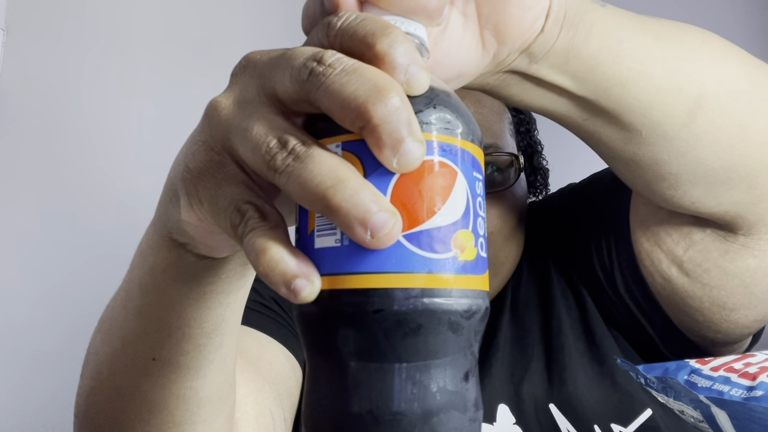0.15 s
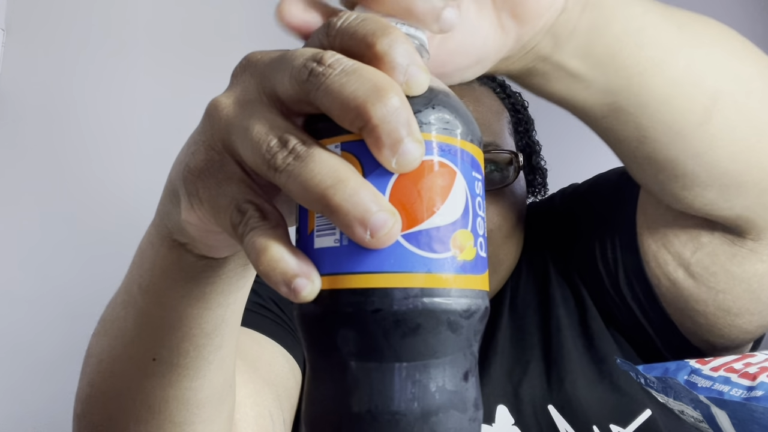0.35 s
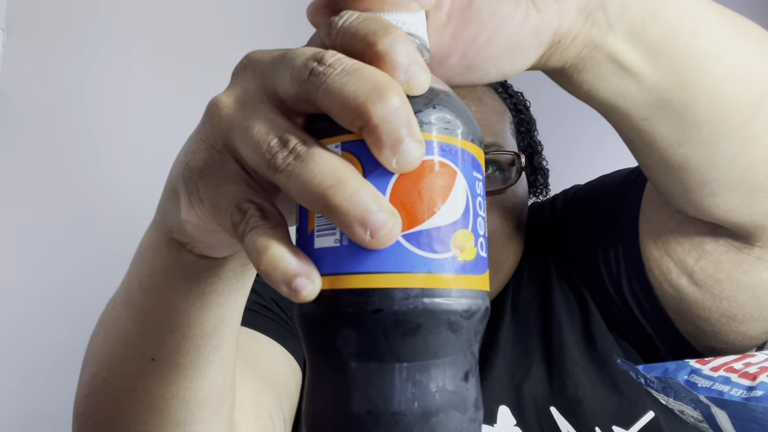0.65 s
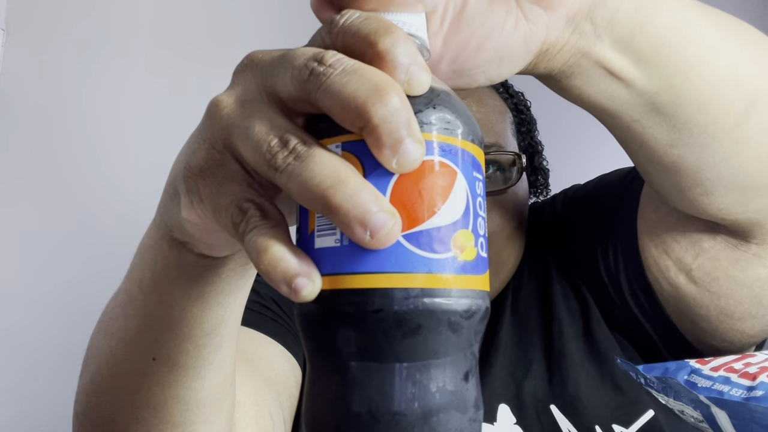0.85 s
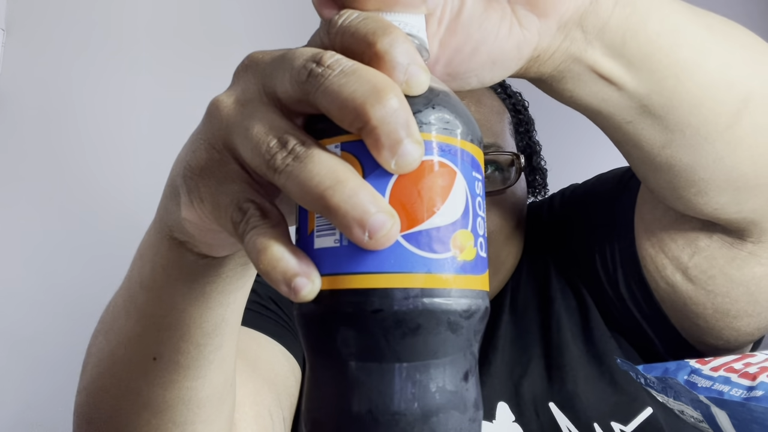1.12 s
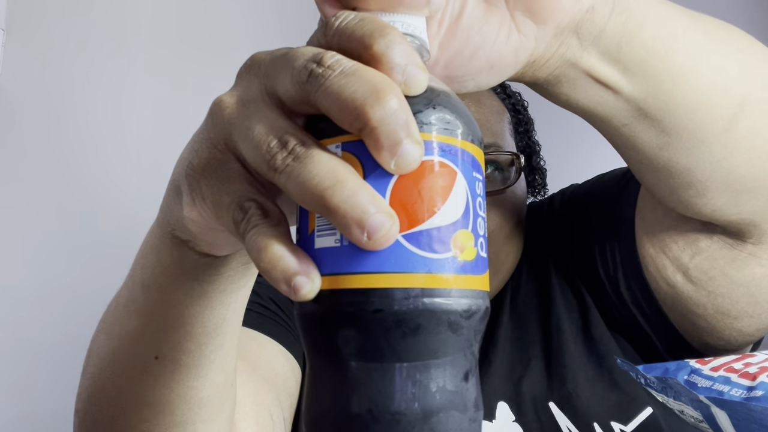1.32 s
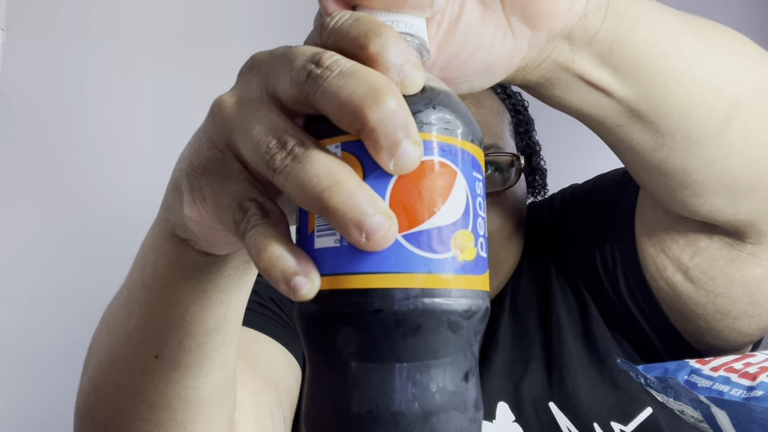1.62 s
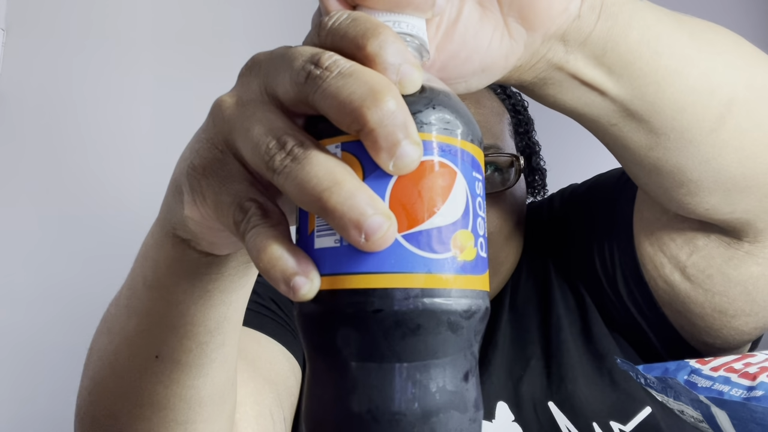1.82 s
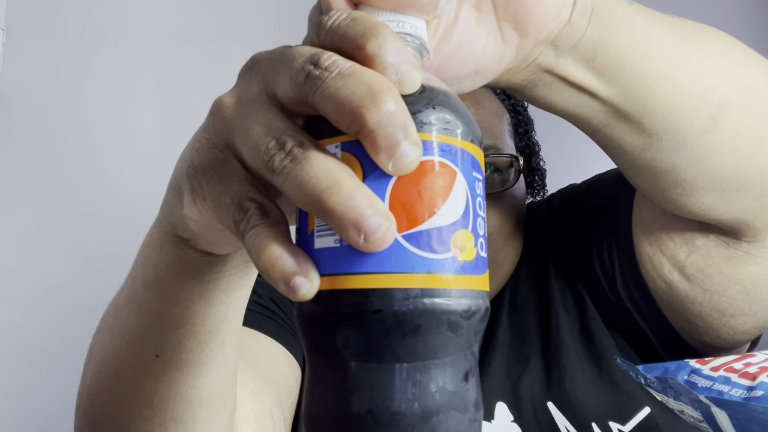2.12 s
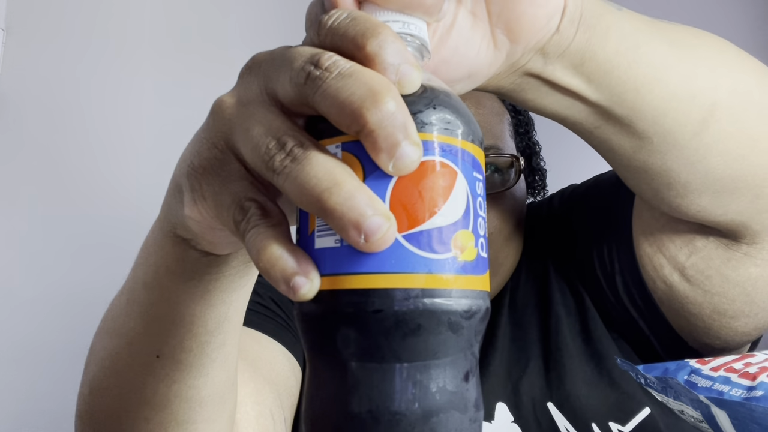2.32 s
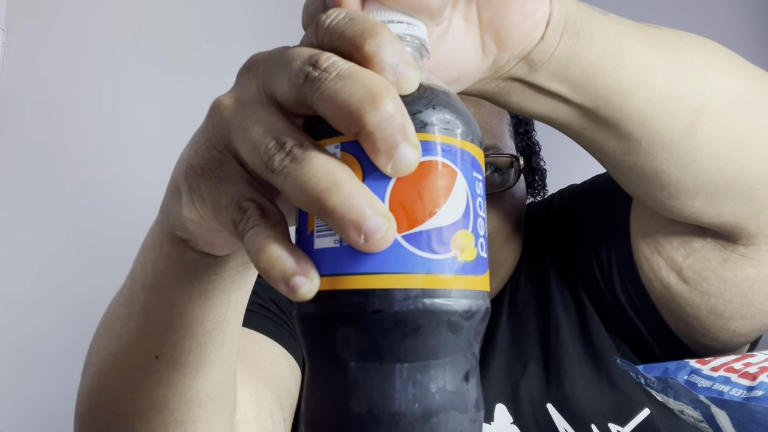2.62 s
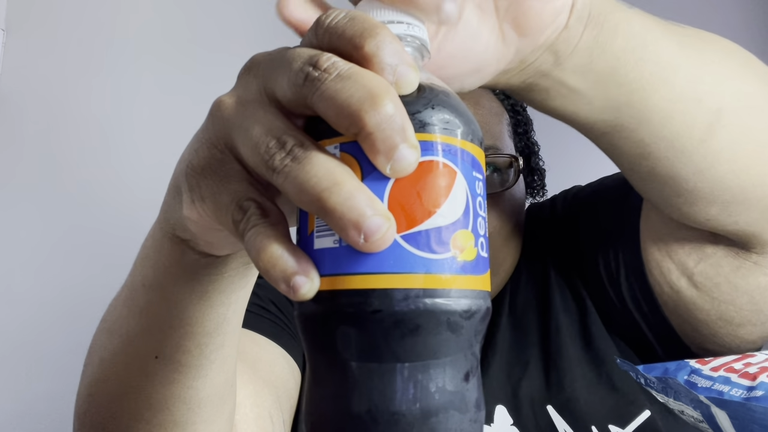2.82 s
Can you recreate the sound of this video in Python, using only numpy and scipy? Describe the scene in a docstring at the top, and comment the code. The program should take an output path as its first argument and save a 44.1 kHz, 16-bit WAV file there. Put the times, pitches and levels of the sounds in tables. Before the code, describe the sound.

Close up in a small room, a plastic bottle of fizzy drink hisses faintly, with soft hand bumps, then louder and crackly as the cap slips, peaking in a sharp spurt and short whistle before a lower breathy release.

```python
"""Gas hisses through the thread of a plastic soda bottle cap, eased open close to a phone in a small room.
The leak is noise and foam sputter coloured by the gap; narrow noise makes its first breathy ring.
Unsteady edge tones whistle for a moment and a lower, resonant noise rushes out as the gap widens.
Damped cracks tick as the cap slips; decaying sines and noise make the hand's bumps, knocks and rubs.
Low resonant noise is the quivering bottle; dark noise and faint sines are the room."""
import sys
import numpy as np
from scipy import signal
from scipy.fft import rfft, irfft
from scipy.io import wavfile
from scipy.ndimage import map_coordinates

SR = 44100
rng = np.random.default_rng(int(sys.argv[2]) if len(sys.argv) > 2 else 0)


def store_pcm(level_fs):
    """Save levels as 16-bit WAV."""
    pcm = np.round(np.clip(level_fs, -1, 1) * 32767).astype(np.int16)
    wavfile.write(sys.argv[1], SR, np.atleast_2d(pcm).T)


N = 130095
T = np.arange(N) / SR
FREQS = np.maximum(np.arange(N // 2 + 1) * SR / N, 1)
TILT_PIVOT_HZ = 7000
FLUTTER_PER_S = 130


def amp(db):
    """Decibels to gain."""
    return 10 ** (np.asarray(db) / 20)


def unit(x):
    """Scale to rms 1."""
    return x / np.sqrt(np.mean(x ** 2) + 1e-30)


def over_hz(points):
    """Join (frequency [Hz], value) points on a log-frequency axis."""
    hz, value = np.array(points).T
    return np.interp(np.log(FREQS), np.log(hz), value)


def over_time(rows):
    """One curve for each column after the time."""
    at_s, *columns = np.array(rows).T
    return [np.interp(T, at_s, column) for column in columns]


def shape(x, gain):
    """Filter by a gain for each frequency."""
    return irfft(rfft(x) * gain, N)


def noise():
    """White noise of rms near 1."""
    return rng.standard_normal(N)


def walk(rate_per_s):
    """Random points joined by lines, with a spread near 1."""
    return map_coordinates(noise(), [T * rate_per_s], order=1) * np.sqrt(3 / 2)


def fade(start_s, decay_s):
    """Sudden start and exponential decay."""
    return (T >= start_s) * np.exp(-np.abs(T - start_s) / decay_s)


def narrow(hz, width_hz):
    """Noise in a narrow resonance that follows a pitch curve."""
    turn = 2 * np.pi * np.cumsum(hz) / SR
    return unit(walk(width_hz) * np.cos(turn) + walk(width_hz) * np.sin(turn))


# leak through the thread: (time [s], level [dB], tilt [dB/octave], treble step [dB], sputter share [0-1])
LEAK_COURSE = [(0, -54, -2, 2, 0), (.24, -50, -3, 3, 0), (.34, -49, 0.5, 1, 0.03), (.42, -54, -3, 16, 0.02),
               (.57, -56, -1, 6, 0.53), (.72, -47.5, -2.5, 11.5, 0.4), (1.05, -49.5, -2, 10.5, 0.08),
               (1.2, -43.5, -0.5, 8, 0.8), (1.39, -45, -2.5, 11, 0.28), (1.53, -43.5, -2, 5.5, 1),
               (1.6, -40.5, 0.5, 1.5, 0.71), (1.86, -39, 3.5, -2.5, 0.41), (2.07, -41.5, 1.5, -3.5, 0.06),
               (2.15, -48, -1, 3.5, 0.7), (2.29, -47.5, 0, 4, 0), (2.48, -33.5, -3, 13.5, 0.1),
               (2.575, -37.5, 5.5, -2, 0.64), (2.6, -49, -3.5, -3, 0.36), (2.7, -49, -5.5, 13, 0.2),
               (2.95, -56.5, -7, 24, 0)]
# colour of the gap under the cap: (frequency [Hz], gain [dB])
GAP_COLOUR = [(1300, -37.5), (1900, -23), (2750, -3.5), (3100, -9.5), (3550, -8.5), (4100, -7.5),
              (4500, -11.5), (5000, -3), (5500, -2), (6000, -9), (6600, -8.5), (6950, -2), (8300, -1),
              (8850, -4), (9200, -9.5), (10400, -9.5), (11500, -13.5), (14500, -21.5), (15600, -8.5)]
FLUTTER_DB, FLICKER_DB, FLICKER_PER_S = 1.2, 1.1, 35.27
TREBLE_HZ = 9620  # centre of the treble step


def leak():
    """Jet noise and sputter ring the gap under the cap; the flow flutters and each band flickers."""
    db, tilt, treble_db, wet = over_time(LEAK_COURSE)
    wet = np.clip(wet, 0, 1)
    jet = np.sqrt(1 - wet) * noise() + np.sqrt(wet) * sputter()
    jet = unit(shape(jet, amp(over_hz(GAP_COLOUR))))
    centres_hz = np.geomspace(1500, 15000, 11)
    out, power = 0, 0
    for hz, pick in zip(centres_hz, np.eye(len(centres_hz))):
        band = shape(jet, np.interp(FREQS, centres_hz, pick))
        tilt_db = tilt * np.log2(hz / TILT_PIVOT_HZ)
        step = (1 + np.tanh(6 * np.log(hz / TREBLE_HZ))) / 2
        gain = amp(tilt_db + treble_db * step)
        out = out + band * gain * amp(FLICKER_DB * walk(FLICKER_PER_S))
        power = power + np.mean(band ** 2) * gain ** 2
    # tilt and treble change the colour, not the level
    return out / np.sqrt(power) * amp(db + FLUTTER_DB * walk(FLUTTER_PER_S))


SPUTTER_PER_S, SPUTTER_SPREAD_DB = 2200, 6.5
POP_DECAY_S = 0.00023  # of the energy


def sputter():
    """Films of foam burst in the gap: dense tiny pops of very unequal size."""
    due = rng.random(N) < SPUTTER_PER_S / SR
    size_db = SPUTTER_SPREAD_DB * np.tanh(noise() / 2) * 2  # soft limit on the extremes
    pops = due * amp(size_db)
    energy = signal.lfilter([1], [1, -np.exp(-1 / (POP_DECAY_S * SR))], pops ** 2)
    return unit(np.sqrt(energy) * noise())


# first narrow opening: (time [s], level [dB])
SEEP_COURSE = [(0, -57), (.22, -50.5), (.36, -77)]
SEEP_HZ, SEEP_WIDTH_HZ = 5300, 1500


def seep():
    """Gas squeezes past the seal with a breathy ring at one pitch until the grip changes."""
    db, = over_time(SEEP_COURSE)
    return narrow(np.full(N, SEEP_HZ), SEEP_WIDTH_HZ) * amp(db) * (T < SEEP_COURSE[-1][0])


BUBBLES_FROM_S, BUBBLES_TO_S, BUBBLES_PER_S = 1.3, 1.7, 68
BUBBLE_DB, BUBBLE_SPREAD_DB = -26.5, 4.5  # impulse before the gap colours it


def bubbles():
    """Larger bubbles burst one by one in the foam: lone impulses ring the gap."""
    due = (T > BUBBLES_FROM_S) & (T < BUBBLES_TO_S) & (rng.random(N) < BUBBLES_PER_S / SR)
    pops = due * amp(BUBBLE_DB + BUBBLE_SPREAD_DB * noise())
    return shape(pops, amp(over_hz(GAP_COLOUR)))


# rush through the widened gap: (time [s], level [dB], resonance centre [Hz])
RUSH_COURSE = [(2.5, -61, 5060), (2.575, -43, 5090), (2.6, -62, 5310), (2.70, -46, 5023),
               (2.735, -39.5, 5020), (2.81, -45.5, 4720), (2.95, -48, 4300)]
# colour of its air noise: (frequency [Hz], gain [dB])
RUSH_AIR_COLOUR = [(200, -25), (900, -22), (1500, -19.5), (2100, -15.5), (2700, -4), (4000, -2), (5100, -8),
                   (6000, -15.5), (15000, -32)]
RUSH_RING_DB, RUSH_WIDTH_HZ, RUSH_SPUTTER = -2, 450, 0.72  # ring and sputter relative to the noise


def rush():
    """The last gas leaves by a wider gap: lower, with a broad resonance that sinks."""
    db, hz = over_time(RUSH_COURSE)
    air = noise() + RUSH_SPUTTER * sputter()
    air = unit(shape(air, amp(over_hz(RUSH_AIR_COLOUR))))
    ringing = unit(air + amp(RUSH_RING_DB) * narrow(hz, RUSH_WIDTH_HZ))
    return ringing * amp(db + walk(FLUTTER_PER_S)) * (T > RUSH_COURSE[0][0])


# whistles at the edge of the gap, strong then thin: (time [s], pitch [Hz], level [dB])
STRONG_WHISTLE = [(2.57, 8340, -47), (2.593, 8480, -36.5), (2.604, 8930, -41.5), (2.613, 8100, -36),
                  (2.626, 8300, -36), (2.64, 8160, -37), (2.652, 8580, -42.5), (2.659, 8650, -55)]
FAINT_WHISTLE = [(2.78, 9150, -60), (2.835, 9020, -55), (2.862, 8450, -59), (2.89, 8270, -60.5)]


def whistle(rows, jitter_hz, rough):
    """An unsteady edge tone with a noisy skirt."""
    hz, db = over_time(rows)
    tone = unit(np.sin(2 * np.pi * np.cumsum(hz + jitter_hz * walk(500)) / SR))
    sounding = (T > rows[0][0]) * (T < rows[-1][0])
    return unit(tone + rough * narrow(hz, width_hz=840)) * amp(db) * sounding


# slips of the cap on its thread: (time [s], relative level [dB], decay [ms], tilt [dB/octave])
CAP_TICKS = [(0.2237, -27, 1.4, -1), (0.2538, -21.5, 1.6, -9.5), (1.323, -23, 0.66, 3),
             (1.4179, -22, 1.1, -6), (1.4522, -25, .45, 0), (1.463, -25, 1.7, 0), (1.8508, -16.5, .45, 6),
             (1.8952, -23.5, 1.7, 2), (2.1814, -22, 2.7, 0), (2.195, -27, 0.86, -6),
             (2.3696, -13, 0.65, -4.5)]
# colour of a tick: (frequency [Hz], gain [dB])
CAP_COLOUR = [(700, -46), (1500, -39.5), (2500, -23.5), (3600, -6), (5200, -10), (6300, -5), (8000, 1.5),
              (9500, -2.5), (15000, -12)]
TICK_RISE_S = 0.00022


def ticks():
    """Short cracks of the plastic cap: each builds for an instant and is quickly damped."""
    out, colour_db = 0, over_hz(CAP_COLOUR)
    octaves = np.log2(np.maximum(FREQS, 2000) / TILT_PIVOT_HZ)
    for at_s, db, decay_ms, tilt in CAP_TICKS:
        swell = np.exp(-np.abs(T - at_s) / np.where(T < at_s, TICK_RISE_S, decay_ms / 1000))
        grains = rng.choice([-1., 1.], N) * swell
        crack = unit(shape(grains, amp(colour_db + tilt * octaves)))
        # energy of the swell, whatever the colour
        out = out + amp(db) * crack * np.sqrt(np.mean(swell ** 2)) / 2
    return out


# bumps of the hand on the bottle: (time [s], pitch [Hz], level [dB], three times the rise [s])
HAND_BUMPS = [(0.285, 85.5, -35.5, 0.024), (0.359, 89, -34.5, 0.034), (0.385, 87, -32.5, 0.01)]
# knocks and rubs of the hand on the bottle: (time [s], level [dB], decay [s])
HAND_CONTACTS = [(0.275, -60.5, 0.13), (0.3539, -42.5, 0.0073), (0.592, -58.5, 0.045), (2.805, -55, 0.016)]
# colour of a knock or rub: (frequency [Hz], gain [dB])
CONTACT_COLOUR = [(130, -2.5), (300, 9.5), (450, -1), (660, 2.5), (1000, -14), (2400, -20.5), (6000, -21)]


def handling():
    """Soft low bumps of the full bottle, and knocks and rubs of the hand on it as decaying noise."""
    out = 0
    for start_s, hz, db, length_s in HAND_BUMPS:
        age_s = np.maximum(T - start_s, 0)
        swell = 3 * age_s / length_s
        out = out + amp(db) * swell * np.exp(1 - swell) * np.sin(2 * np.pi * hz * age_s)
    contact = unit(shape(noise(), amp(over_hz(CONTACT_COLOUR))))
    level = sum(amp(db) * fade(start_s, decay_s) for start_s, db, decay_s in HAND_CONTACTS)
    return out + contact * level


# quiver of the bottle in the straining hand: (time [s], level [dB])
QUIVER_COURSE = [(0, -64), (.28, -52), (.75, -55), (.82, -67), (1.48, -66.5), (1.65, -58), (2.15, -65),
                 (2.25, -50.5), (2.58, -66.5), (2.75, -48.5), (2.95, -60)]
QUIVER_HZ = 69.7


def quiver():
    """A low resonant rumble that comes and goes as the hand strains at the cap."""
    db, = over_time(QUIVER_COURSE)
    body = 1 / np.hypot(1, 2 * (FREQS / QUIVER_HZ - QUIVER_HZ / FREQS)) ** 2
    return unit(shape(noise(), body)) * amp(db)


# colour of the room noise: (frequency [Hz], gain [dB])
ROOM_COLOUR = [(20, 2), (60, -7.5), (125, 3), (170, -1.5), (400, -8), (520, -21), (800, -24), (1400, -38),
               (16000, -92)]
# hum: (frequency [Hz], level [dB])
ROOM_HUM = [(59.2, -66), (231.5, -70), (290.7, -77.5), (355.3, -74.5)]
ROOM_DB, ROOM_WIDE_HZ = -60, 373  # full stereo width from ROOM_WIDE_HZ up


def room():
    """Low rumble, more alike in both channels in the bass, with a faint wavering hum."""
    colour = amp(over_hz(ROOM_COLOUR))
    mid, side = (unit(shape(noise(), colour)) for _ in range(2))
    side = shape(side, np.clip(FREQS / ROOM_WIDE_HZ, .25, 1))
    hum = 0
    for hz, db in ROOM_HUM:
        level = amp(db + 2 * walk(3.53)) * np.sqrt(2)
        hum = hum + level * np.sin(2 * np.pi * hz * T + walk(6))
    return amp(ROOM_DB) * (mid + side * np.array([[1], [-1]])) + hum


# phase lead of the left port over the right: (frequency [Hz], phase [rad])
LEFT_LEAD = [(1700, 1.5), (2400, 1.53), (3300, 3), (4200, 5), (5000, 5), (5800, 4.5), (6500, 5.5),
             (7200, 1.5), (8300, -0.05), (9000, -1.06), (10200, -4), (12100, -5), (15900, -9.5)]
# extra level of the left port over the right: (frequency [Hz], level [dB])
LEFT_EXTRA = [(1500, -1), (3100, 1), (4600, -3), (5300, 0.5), (6200, -4.5), (6900, 5.5), (8000, -1),
              (12000, 0.5)]
WALLS_DB, WALLS_T60_S, WALLS_DELAY_S = -7, .08, 0.0009


def ports(x):
    """Sound meets two microphone ports with unlike phase and level, then short wall reflections."""
    hz, radians = np.array(LEFT_LEAD).T
    lead = np.exp(.5j * np.interp(FREQS, hz, radians))
    decay = fade(WALLS_DELAY_S, WALLS_T60_S / np.log(1000))
    tails = [rfft(noise() * decay) for _ in range(2)]
    left, right = (amp(WALLS_DB) * h / np.sqrt(np.mean(np.abs(h) ** 2)) for h in tails)
    balance = amp(over_hz(LEFT_EXTRA) / 2)
    spectra = np.array([(lead + left) * balance, (lead.conj() + right) / balance])
    responses = np.roll(irfft(spectra, N), N // 2, axis=1)  # centred: a lead needs room before zero
    heard = signal.fftconvolve(x[None], responses, axes=1)[:, N // 2:N // 2 + N]
    return heard / np.hypot(1, amp(WALLS_DB))


def scene():
    """Gas and cap pass the ports; hand, quiver and room are added a little louder on the right."""
    gas = leak() + seep() + bubbles() + rush()
    gas = gas + whistle(STRONG_WHISTLE, jitter_hz=111.6, rough=0.51)
    gas = gas + whistle(FAINT_WHISTLE, jitter_hz=22, rough=.2)
    around = handling() + quiver() + room()
    return ports(gas + ticks()) + around * amp(np.array([[-1], [1]]))


LOW_CUT_HZ, TOP_HZ = 58.5, 15900


def record(dry):
    """The phone cuts the deepest bass gently and the top steeply."""
    thin = signal.sosfilt(signal.butter(2, LOW_CUT_HZ, "high", fs=SR, output="sos"), dry)
    return signal.sosfilt(signal.ellip(10, .2, 80, TOP_HZ, fs=SR, output="sos"), thin)


dry = scene()
out = record(dry)
store_pcm(out)
```